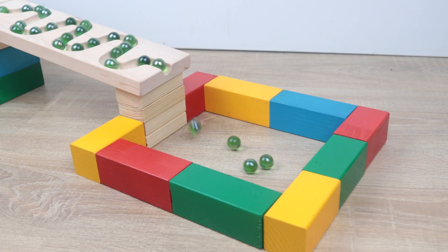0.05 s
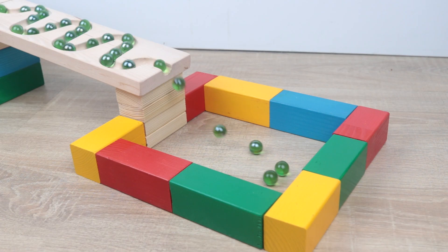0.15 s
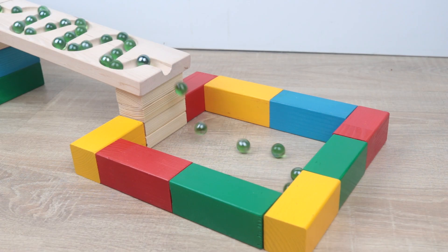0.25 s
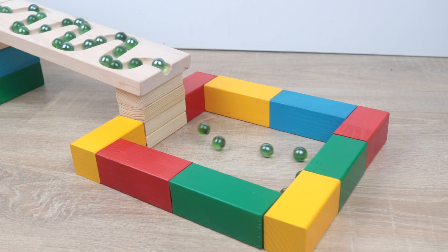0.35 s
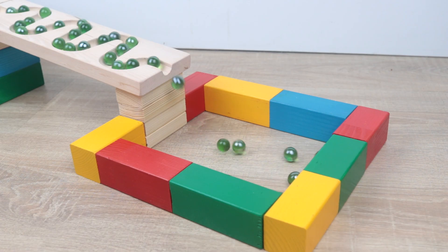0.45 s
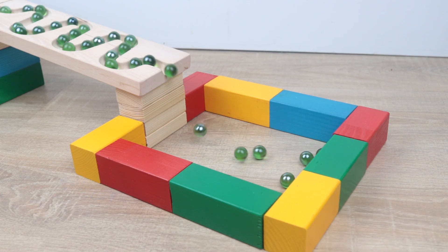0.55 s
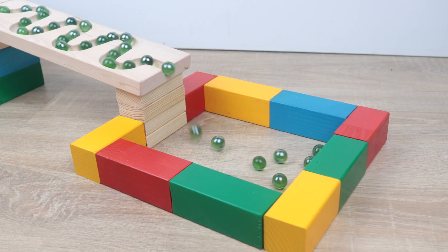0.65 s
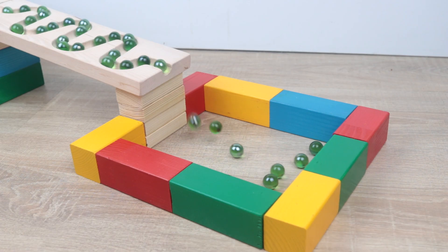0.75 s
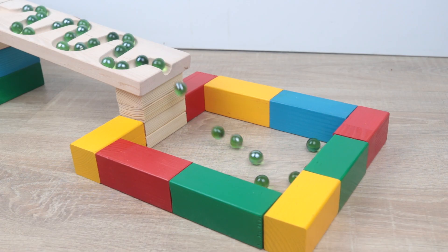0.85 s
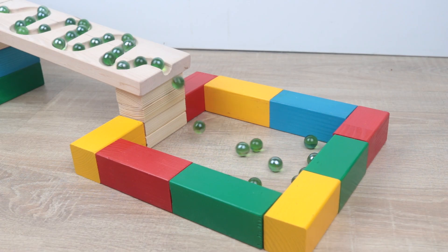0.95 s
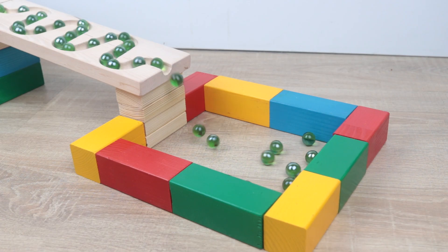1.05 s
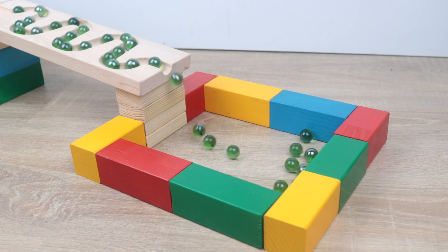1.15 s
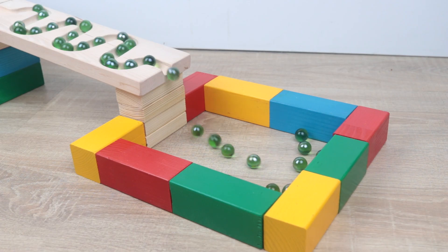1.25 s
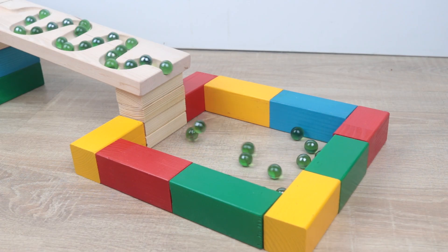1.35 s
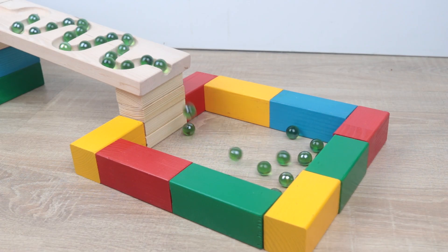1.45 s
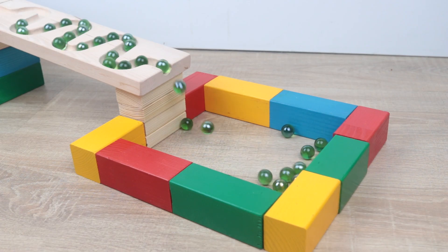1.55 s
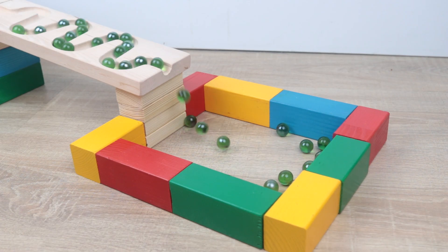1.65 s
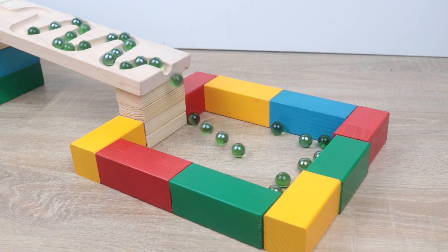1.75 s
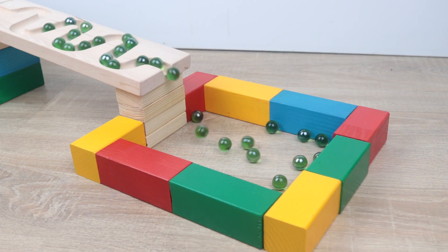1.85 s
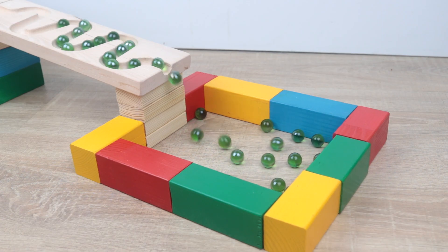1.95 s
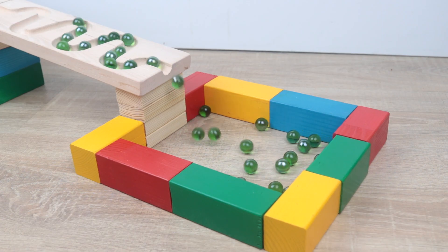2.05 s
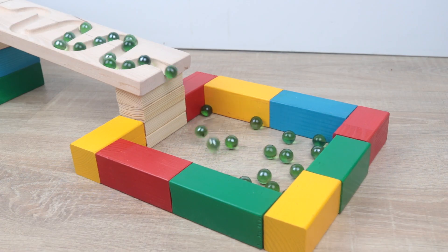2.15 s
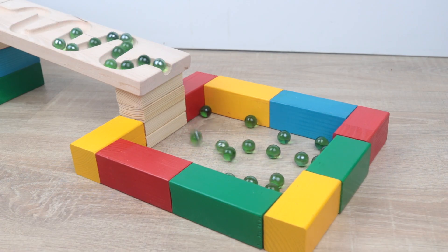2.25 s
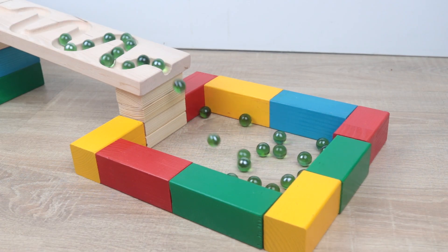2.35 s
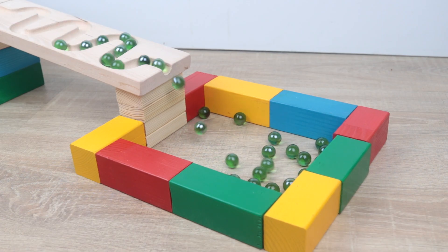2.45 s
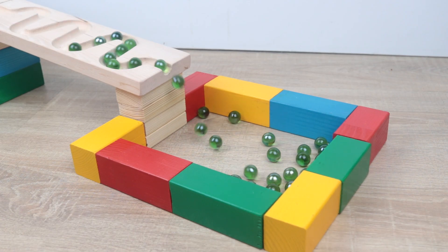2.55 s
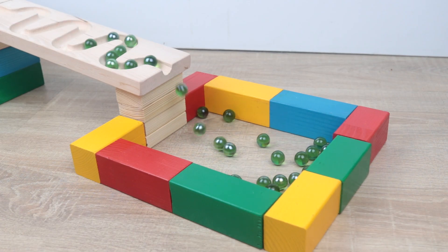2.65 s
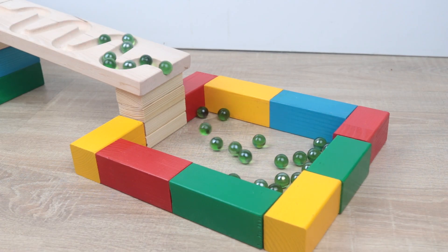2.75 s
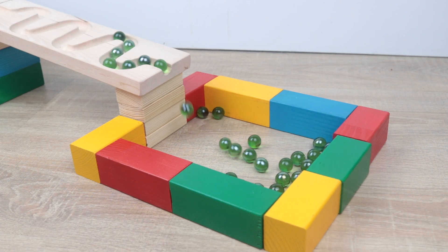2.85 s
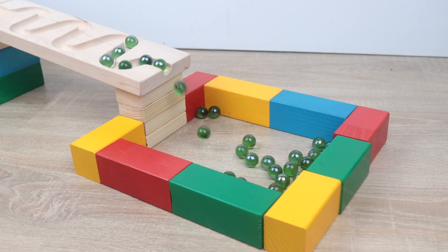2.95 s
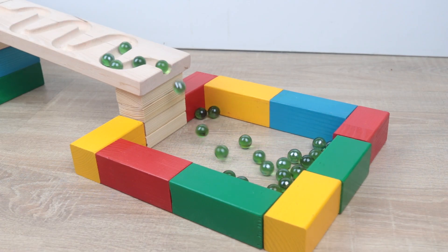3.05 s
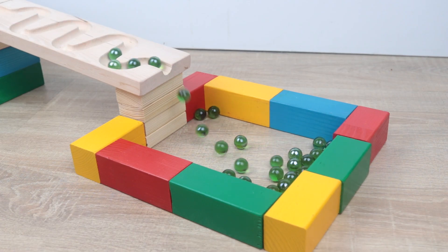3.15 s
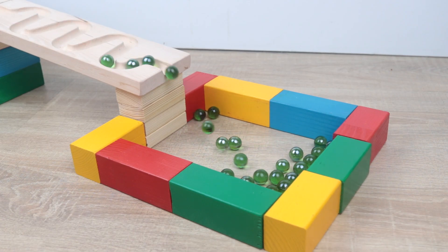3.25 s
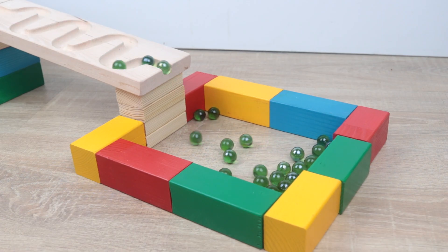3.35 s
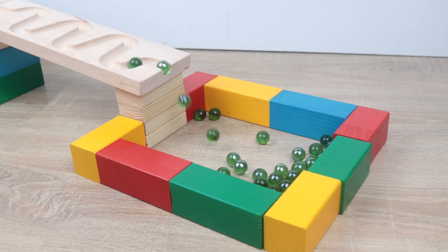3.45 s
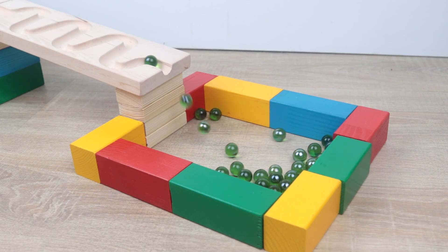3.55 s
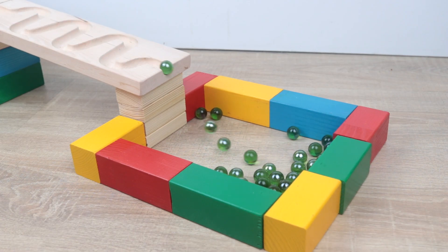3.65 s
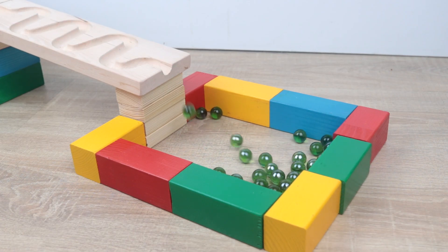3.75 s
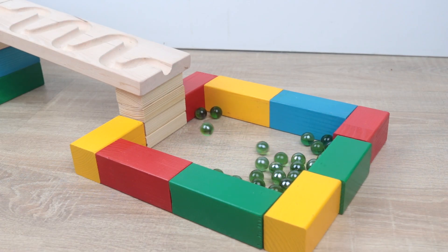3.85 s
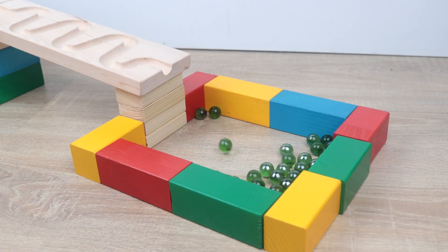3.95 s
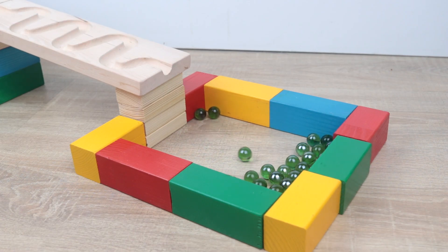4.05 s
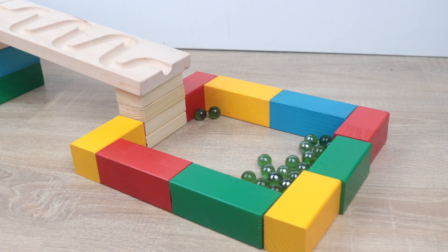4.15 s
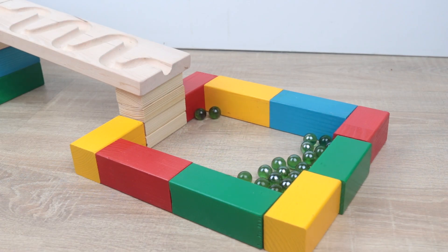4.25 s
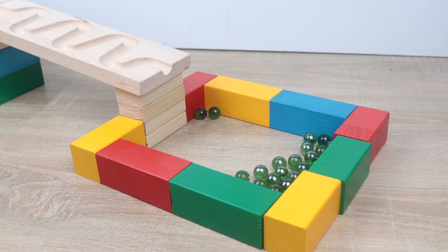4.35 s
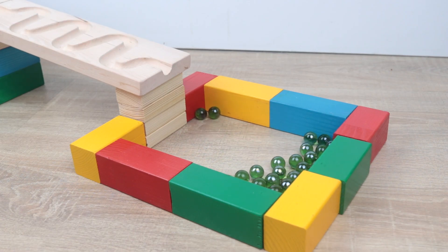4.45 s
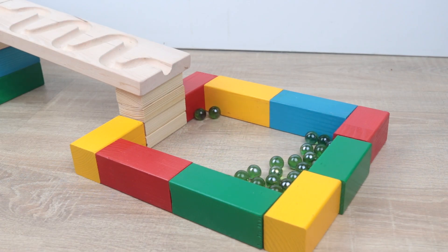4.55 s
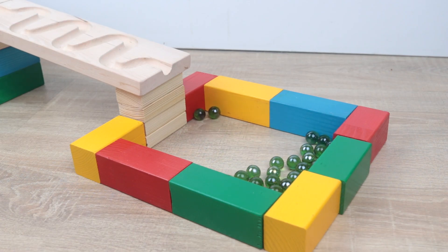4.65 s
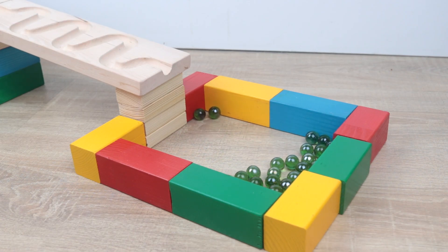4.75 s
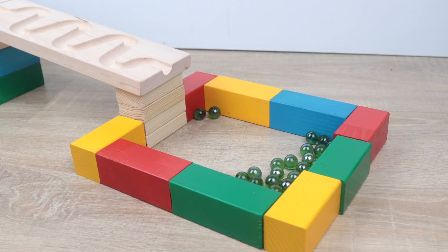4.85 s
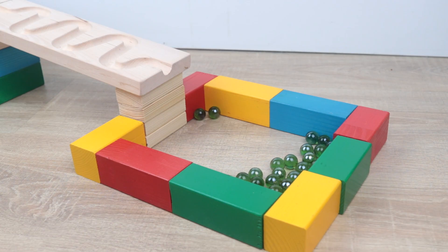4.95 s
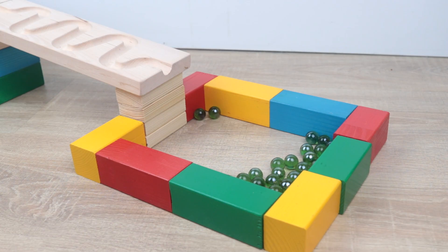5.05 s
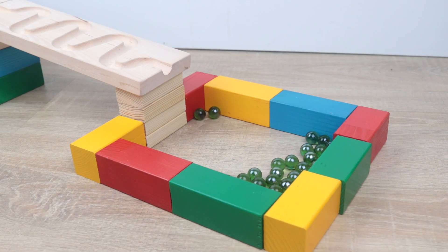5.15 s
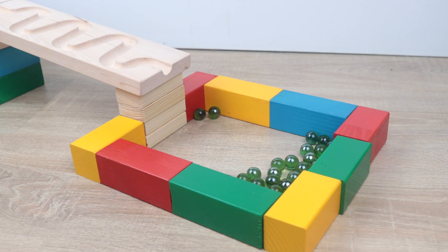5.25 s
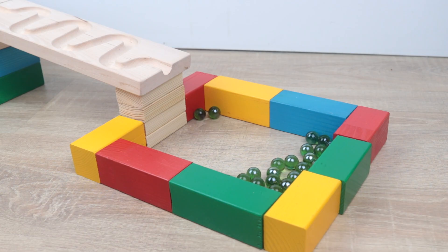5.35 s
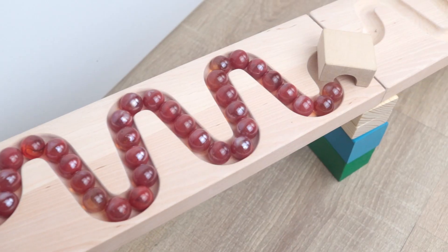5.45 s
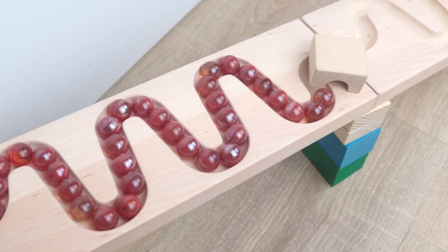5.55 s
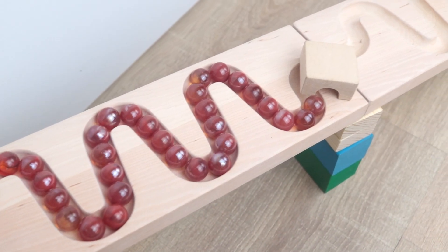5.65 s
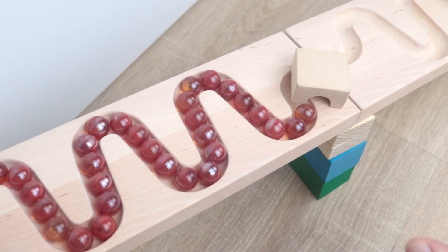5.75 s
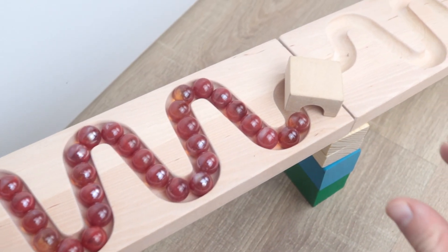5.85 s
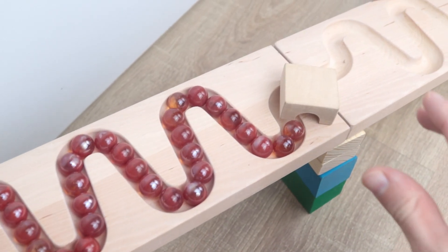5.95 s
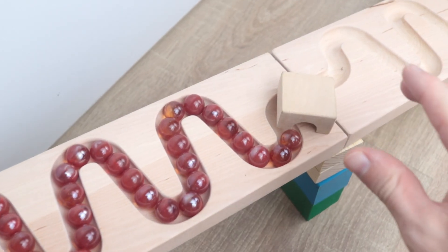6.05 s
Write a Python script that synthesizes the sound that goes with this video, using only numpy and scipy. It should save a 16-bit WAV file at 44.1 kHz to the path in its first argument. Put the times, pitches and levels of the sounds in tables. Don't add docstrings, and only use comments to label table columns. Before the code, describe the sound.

Glass marbles rattle down a grooved wooden track and knock rapidly onto a laminate floor, clicking into a settling heap before the room goes quiet.

```python
import sys
import numpy as np
from scipy import signal
from scipy.fft import rfft, irfft, next_fast_len
from scipy.io import wavfile

SR = 44100
rng = np.random.default_rng(int(sys.argv[2]) if len(sys.argv) > 2 else 0)


def decibels_to_gain(level_db):
    exponent = np.asarray(level_db, float) / 20
    return 10 ** exponent


def wav_out(sig):
    wavfile.write(sys.argv[1], SR, np.round(np.clip(np.atleast_2d(sig).T, -1, 1) * 32767).astype(np.int16))


N = 269010


def rms_one(x):
    return x / np.sqrt(np.mean(x ** 2) + 1e-20)


def white():
    return rng.standard_normal((2, N))


def in_time(rows):
    s, *columns = np.transpose(rows)
    return [np.interp(np.arange(N) / SR, s, c) for c in columns]


def at_hz(points, hz):
    table_hz, value = np.transpose(points)
    return np.interp(np.log(hz), np.log(table_hz), value)


def band(x, low_hz, high_hz, order=2):
    edges = [low_hz, min(high_hz, SR / 2.2)]
    return signal.sosfilt(signal.butter(order, edges, "band", fs=SR, output="sos"), x)


# pitch_hz, likeness (0 to 1)
LIKENESS = [(60, 0.98), (300, .93), (700, 0.92), (1400, 0.27), (3000, 0.018), (15000, 0.096)]


def coloured(noise, spectrum):
    size = next_fast_len(N)
    hz = np.maximum(np.arange(size // 2 + 1) * SR / size, 1)
    alike = np.clip(at_hz(LIKENESS, hz), 0, 1)
    mid, side = rfft(noise, size)
    both = np.sqrt(1 + alike) * mid + np.sqrt(1 - alike) * side * [[1], [-1]]
    return rms_one(irfft(both * decibels_to_gain(at_hz(spectrum, hz)), size)[:, :N])


def clicks(seconds, sizes):
    out = np.full((2, N), 1e-18)
    np.add.at(out, (slice(None), (np.asarray(seconds) * SR).astype(int)), sizes.T)
    return out


def panned(db, pan_db):
    return decibels_to_gain(db[:, None] + pan_db[:, None] * [.5, -.5])


def dying(pulses, t60):
    return signal.lfilter([1], [1, -decibels_to_gain(-60 / (t60 * SR))], pulses)


def strike(seconds, sizes, modes, vary_db, apart_db):
    out = 0
    chance = rng.standard_normal((len(seconds), len(modes), 3))
    for k, (hz, level_db, t60) in enumerate(modes):
        r, w = decibels_to_gain(-60 / (t60 * SR)), 2 * np.pi * hz / SR
        mode_db = level_db + vary_db * chance[:, k, :1] + apart_db * chance[:, k, 1:]
        strength = (-1) ** k * sizes * decibels_to_gain(mode_db)
        out = out + signal.lfilter([0, np.sin(w)], [1, -2 * r * np.cos(w), r * r], clicks(seconds, strength))
    return out


def crack(seconds, sizes, low_hz, high_hz, t60, alike):
    shared, *own = rng.standard_normal((3, N))
    return band(dying(clicks(seconds, sizes), t60) * (alike * shared + np.array(own)), low_hz, high_hz)


# pitch_hz, level_db (per Hz)
HOUSE_HUM = [(22, -43), (45, -3.5), (66, 3.5), (80, -6), (125, -3.5), (160, -10), (300, -12.5)]


def house_hum():
    hum_db = -54 + np.interp(np.arange(N) / SR, [4.0, 4.31], [-19, 0])
    return decibels_to_gain(hum_db) * coloured(white(), HOUSE_HUM + [(700, -49)])


# pitch_hz, level_db (per Hz)
MICROPHONE_HISS = [(150, -36.5), (250, -13.5), (386, -3.5), (597, -5.5), (1760, -10.5), (3230, -9),
                   (4650, -10.5), (6250, -11), (16000, -25.5)]


def microphone_hiss():
    t = np.arange(N) / SR
    brighten_s, swell_s, dull_hz, treble_before_db = 5.36, .15, 1500, -7
    hiss = decibels_to_gain(-53.5) * coloured(white(), [(120, -29)] + MICROPHONE_HISS)
    treble = decibels_to_gain(treble_before_db * np.clip(1 - (t - brighten_s) / swell_s, 0, 1))
    dull = signal.lfilter(*signal.butter(2, dull_hz, fs=SR), hiss)
    return treble * hiss + (1 - treble) * dull


def handling():
    t = np.arange(N) / SR
    sleeve_s, bump_s, bump_rise_s = 5.41, 5.992, 0.019
    swell = np.clip((t - bump_s) / bump_rise_s, 0, 1) * decibels_to_gain(-48 + 117.5 * (t - bump_s))
    bump = coloured(white(), [(40, -27), (80, 10.0), (130, 8), (250, -3.0), (500, -7.5), (800, -40.0)])
    brush = decibels_to_gain(-47.5 - 300 * abs(t - sleeve_s))
    sleeve = coloured(white(), [(1500, -11.0), (3500, -2), (6000, -5), (16000, -22.5)])
    return swell * bump + brush * sleeve


# pitch_hz, level_db
ROOM_TONE = [(300, -10), (1000, 1), (4000, -2), (8000, 2.5), (16000, -7)]


def room(x):
    t60_s, level_db, rise_s = 0.12, -11, 0.0026
    t = np.arange(SR // 2) / SR
    wash = coloured(white(), ROOM_TONE)[:, :len(t)]
    wash = wash * decibels_to_gain(-60 * t / t60_s) * np.clip(t / rise_s, 0, 1)
    wash = wash / np.sqrt(np.sum(wash ** 2) / 2)
    return decibels_to_gain(level_db) * signal.fftconvolve(x.mean(axis=0)[None], wash)[:, :N]


def rolling(low_db, mid_db, high_db, spectrum, spread_db):
    uneven = decibels_to_gain(spread_db * np.minimum(rng.exponential(1, N), 5))
    grains = white() * uneven * (rng.random(N) < .2)
    bed = coloured(grains, spectrum)
    rumble = decibels_to_gain(low_db) * rms_one(band(bed, 300, 1700))
    rattle = decibels_to_gain(mid_db) * rms_one(band(bed, 1500, 5500))
    hiss = decibels_to_gain(high_db) * rms_one(band(bed, 5500, 16000))
    return rumble - rattle + hiss


# pitch_hz, level_db (per Hz)
TRACK = [(250, -7.5), (460, -4), (493, 12), (530, 2.5), (1200, -0.5), (1800, -5.5), (2700, -0.5),
         (4800, -6), (6700, -18.5), (11300, -30), (16000, -37.5)]
# start_s, level_db
CROWD = [
    (0, -33.5),
    (1.0, -35),
    (2.0, -35.5),
    (3.2, -36),
    (4.08, -34),
    (4.16, -79),
]


def track():
    crowd_db, = in_time(CROWD + [(4.3, -120)])
    return rolling(crowd_db - 3, crowd_db, crowd_db - 7.5, TRACK, spread_db=1.5)


# start_s, level_db (peak)
NUDGES = [(4.434, -25), (4.484, -32), (4.523, -31.5), (4.543, -24), (4.624, -23.5), (4.679, -26.5),
          (4.728, -23.5), (4.775, -40), (4.892, -35), (4.928, -17), (4.981, -43), (5.076, -29.5),
          (5.285, -37), (5.348, -37.5)]


def creeping():
    s, db = np.transpose(NUDGES)
    fall = dying(clicks(s, panned(db, 0 * db))[0], t60=.4)
    return -27.5 + 20 * np.log10(fall + 1e-9)


# pitch_hz, width_hz, level_db
BOARD_RINGS = [(1430, 75, -7.5), (1830, 35, 4), (1966, 16, -4.5), (2393, 29, -7), (2793, 27, -11),
               (3250, 91, -8), (3870, 56, 3)]


def boards(x):
    out = x
    for hz, width, db in BOARD_RINGS:
        r = np.exp(-np.pi * width / SR)
        poles = [1, -2 * r * np.cos(2 * np.pi * hz / SR), r * r]
        out = out + decibels_to_gain(7 + db) * signal.lfilter([1 - r, 0, r - 1], poles, x)
    return out


# pitch_hz, level_db (per Hz)
FLOOR = [(300, -8), (530, 0), (700, -2), (1500, -4.5), (1800, -7.5), (2800, 2), (4000, -8), (9000, -12.5),
         (16000, -20.5)]
# start_s, level_db, brightness_db
RUN_OUT = [
    (4.06, -58, -17),
    (4.12, -34, -15),
    (4.17, -29, -12),
    (4.26, -26, -36),
    (4.3, -29, -10),
    (4.35, -28, -6),
    (4.385, -38.5, -3),
    (4.41, -45.5, 1),
    (4.47, -65, 9),
]


def last_marble():
    run_db, bright_db = in_time(RUN_OUT + [(4.55, -120, 0)])
    creep_db = creeping()
    low_db = np.maximum(run_db - 2.5, creep_db)
    mid_db = np.maximum(run_db, creep_db - 15)
    high_db = np.maximum(run_db + bright_db, creep_db - 34)
    return boards(rolling(low_db, mid_db, high_db, FLOOR, spread_db=2.0))


# lag_ms, level_db
PEN = [(.9, -6), (1.6, -5), (2.3, -8), (3.0, -11), (5.8, -17)]


def pen(s, db):
    ms, loss_db = np.transpose([(0.018, 0.0037)] + PEN)
    lags = ms / 1000 * (1 + .07 * rng.standard_normal((len(s), len(ms))))
    return (s[:, None] + lags).ravel(), (db[:, None] + loss_db).ravel()


# pitch_hz, level_db, t60_s
BLOCK = [(535, 8, 0.016), (986, 7.5, 0.053), (1540, -26, 0.057), (2044, 0.5, 0.044), (2500, -20, 0.038)]


def nudged_blocks():
    s, db = pen(*np.transpose(NUDGES))
    tap = strike(s, panned(db - 23, 0 * db), BLOCK, vary_db=2.5, apart_db=-0.5)
    return tap + crack(s, panned(db - 16.5, 0 * db), 544, 2400, t60=0.049, alike=1.16)


# start_s, level_db (peak), pitch_hz, pan_db (left over right)
TICKS = [(4.132, -60, 4720, 11.5), (4.1475, -19.5, 4540, -1.5), (4.1933, -44, 4930, -0.5),
         (4.2366, -15.5, 4730, -1), (4.291, -11, 9800, -3), (4.3336, -12.5, 10500, -3),
         (4.348, -15, 7640, -1.5), (4.3803, -14, 9200, 1), (4.4398, -24, 5500, -2), (4.51, -38, 4930, 0.0),
         (4.525, -33, 5370, -3), (4.5752, -35.5, 9180, -2), (4.5993, -31, 5300, -3),
         (4.6242, -26, 7800, -1), (4.6596, -28, 5500, 0), (4.6887, -32, 10170, -2.0),
         (4.728, -33, 9800, -3), (4.7509, -39, 6050, -3.5), (4.767, -38, 5250, -14),
         (4.8562, -45, 6660, -1), (4.8771, -49, 5786, 2), (4.9016, -54, 6200, 2), (4.9285, -50, 4910, -6),
         (4.9355, -45, 4700, -2), (4.9525, -28.5, 7600, -3), (5.0752, -54, 6340, 1.5),
         (5.2214, -66.5, 8100, -1), (5.2328, -38.5, 4870, -2)]


def glass_ticks():
    s, db, hz, pan_db = np.transpose(TICKS)
    burst = crack(s, panned(db - 4.5, pan_db), 4300, 9600, t60=0.038, alike=0.84)
    out = band(burst, 2800, 15300)
    t = np.arange(900) / SR
    for at, gain, f in zip((s * SR).astype(int), panned(db + 3.5, pan_db), hz):
        ping = rng.standard_normal((2, 900)) * decibels_to_gain(-60 * t / 0.035)
        out[:, at:at + 900] += gain[:, None] * band(ping, f / 1.174, f * 1.024)
    return out


# landing_s, knock_db, rebound_s, knock_db
EARLY_MARBLES = [(0.1721, 1.5, 0.2927, 3.5), (0.3309, 4, 0.457, -6.5), (0.4225, 4.5, 0.5457, -6),
                 (0.6338, 0, 0.7529, 2.5), (0.7681, -0.5, 0.8988, -10), (0.879, 4.5, 0.9964, -2.5),
                 (1.0227, -1.5, 1.1481, -7.5), (1.1346, 3, 1.254, -10), (1.2401, 0, 1.3647, -9),
                 (1.3419, 0, 1.4217, -11), (1.4444, 1, 1.5274, -14), (1.5365, 0, 1.658, -13),
                 (1.5916, 4.5, 1.7143, 5), (1.7264, -0.5, 1.8434, -8.5), (1.8122, 0.5, 1.9348, -0.5),
                 (1.9417, -2.5, 2.0667, -13)]
LATE_MARBLES = [(2.0568, 5, 2.1785, -8), (2.1468, 0, 2.2725, -8.5), (2.2374, 1.5, 2.3596, -5),
                (2.3663, -2.5, 2.4905, -2), (2.529, 2, 2.6559, -7), (2.6355, 2.5, 2.7604, -9),
                (2.7368, -3, 2.8642, -6.5), (2.8233, -2, 2.9534, -3), (2.9961, 1, 3.1129, 1),
                (3.1261, 0, 3.2403, -12.5), (3.2288, 3.5, 3.3458, -7.5), (3.3141, 0, 3.4387, -5),
                (3.4631, -0.5, 3.5888, 4.5), (3.6069, -1, 3.7319, -8), (3.7068, 4, 3.8249, -0.5),
                (3.8934, 3.5, 4.0136, 5)]
# start_s, knock_db
HOPS = [(0.0505, -7.5), (0.1211, -17), (1.2187, -10.5), (1.32, -10), (1.4974, -13.5), (1.6087, -12),
        (1.6888, -12.5), (1.7809, -11.5), (1.9063, -13), (1.9257, -15), (2.1361, -9.5), (2.5199, -18.5),
        (2.5655, -9.5), (2.616, -11.5), (2.7249, -9.5), (2.9289, -11), (2.9809, -15), (3.021, -15),
        (3.304, -7), (3.4179, -8), (3.661, -9), (3.8846, -13)]
# start_s, knock_db, loss_db (a hop)
SKIPS = [(0.091, -1, 6.5), (0.3647, -12, 0.5), (0.527, -8.5, 7.5), (0.626, -7.5, 4.5), (0.8166, -13.5, 1.7),
         (0.9683, -9, 10.5), (1.0562, -18, 0.8), (1.9982, -13.5, 0), (2.346, -9, 11.5),
         (2.4286, -14.5, -1.5), (3.0684, -14, 3), (3.1778, -11.5, -0.5), (3.385, -20.5, 6.5),
         (3.5038, -14, 1), (3.7978, -10, 11.5), (4.076, -5.5, 4.5)]
FLIGHTS_MS = [59.1, 45.9, 44.2, 54.7, 39.5, 43.9, 35.6, 34.7, 46.1, 38.4, 27.9, 38.3, 17.8, 39.4, 41.8,
              35.7]


def contacts():
    rows = [(s, db, 2) for s, db in HOPS]
    for land_s, land_db, rebound_s, rebound_db in list(EARLY_MARBLES) + list(LATE_MARBLES):
        rows += [(land_s, land_db, 0), (rebound_s, rebound_db, 1)]
    shrinks, extra_loss_db = .61, 0.5
    for (s, db, loss_db), ms in zip(SKIPS, FLIGHTS_MS):
        for k in range(4):
            flown_s = ms / 1000 * (1 - shrinks ** k) / (1 - shrinks)
            rows.append((s + flown_s, db - loss_db * k - extra_loss_db * k * (k - 1), 2))
    s, db, kind = np.transpose(rows)
    return s, db, kind.astype(int)


# pitch_hz, level_db, t60_s
THUD = [(519, -1.5, 0.01), (720, 3.5, 0.0054), (1085, 2.5, 0.0063), (1310, -1.5, 0.0077),
        (1725, -5, 0.0048)]
# pitch_hz, level_db, t60_s
KNOCK = [(2430, -6, 0.0019), (3037, 1.5, 0.0029), (3478, -1.5, 0.0041), (3945, -6.5, 0.006),
         (4857, -6, 0.0057), (6880, -9.5, 0.00099)]
# lag_ms, level_db, pan_db (left over right)
LANDING_ECHOES = [(0.02, -1, -8), (.5, -9.5, 21), (1.6, -3, 1), (2.3, -8.5, 11.5), (4.5, -12.5, 15),
                  (10, -14, -5)]
REBOUND_ECHOES = [(0.02, -2.5, -1), (.5, -4.5, -23), (1.378, -2, 0.5), (2.2, -18.5, 6), (3.099, -47, 5),
                  (5.799, -15, 4)]
HOP_ECHOES = [(0.02, -3.5, 1.5), (0.502, -13.5, -8), (1.5, 3.5, -6), (2.3, -19, -4), (3.1, -13, 7),
              (5.8, -13.5, 5)]


def drops():
    s, knock_db, kind = contacts()
    # thud_db and tick_db against the knock, tick pan_db
    colours = np.array([(-5.5, -13.5, -4), (-6, -16.5, 8.5), (-4.5, -24, -2.5)])
    thud_db, tick_db, pan_db = colours[kind].T
    thud_chance, tick_chance, spot_chance = rng.standard_normal((3, len(s)))

    thud_gain = panned(knock_db + thud_db - 0.87 * thud_chance + 3.5, 0 * s)
    thud = strike(s - .0006, thud_gain, THUD, vary_db=0.93, apart_db=-0.55)

    tick_gain = panned(knock_db + tick_db + 1.5 * tick_chance + 6.5, pan_db)
    tick = crack(s, tick_gain, 3900, 8000, t60=0.0097, alike=0.68)

    ms, loss_db, side_db = np.array([LANDING_ECHOES, REBOUND_ECHOES, HOP_ECHOES])[kind].T
    heard = s + ms / 1000 * (1 + .04 * spot_chance)
    knock_gain = panned((knock_db + loss_db + 0.5).ravel(), side_db.ravel())
    knock = strike(heard.ravel(), knock_gain, KNOCK, vary_db=1.81, apart_db=3.5)
    return thud - knock + tick


def scene():
    background = house_hum() + microphone_hiss() + handling()
    hits = drops() + glass_ticks() + nudged_blocks()
    held = np.tanh(hits / 1.25) * 1.34
    marbles = hits + room(held) + track() + last_marble()
    return signal.sosfilt(signal.butter(4, 340, "high", fs=SR, output="sos"), marbles) + background


def top_cut(x):
    return signal.sosfilt(signal.butter(12, 16460, fs=SR, output="sos"), x)


LOPSIDED = [
    [0.028],
    [0.033],
]


def record(dry):
    hot = np.clip(dry + np.array(LOPSIDED) * np.minimum(dry ** 2, 4), -1, 1)
    smooth = signal.sosfiltfilt(signal.cheby2(8, 30, 16600, fs=SR, output="sos"), hot)
    return top_cut(np.clip(smooth, -1, 1))


dry = scene()
out = record(dry)
wav_out(out)
```